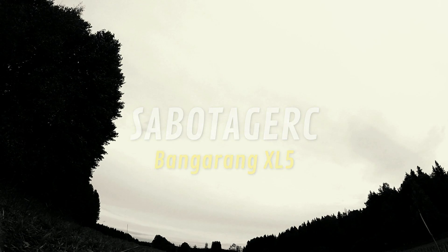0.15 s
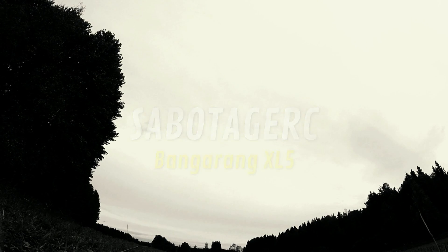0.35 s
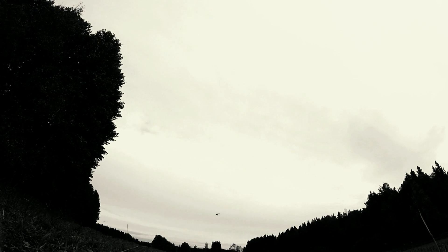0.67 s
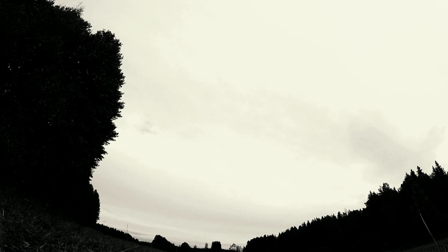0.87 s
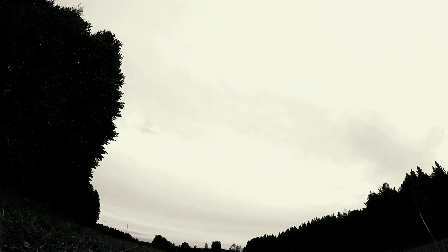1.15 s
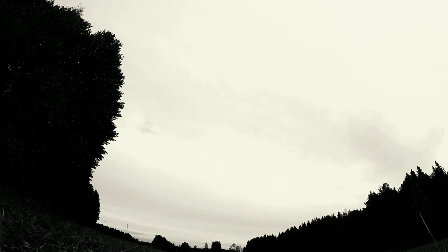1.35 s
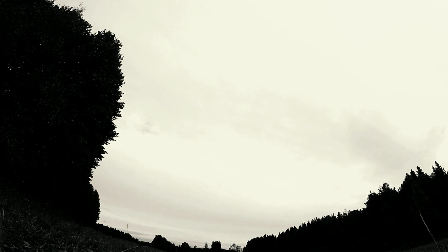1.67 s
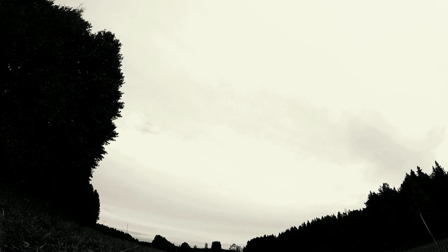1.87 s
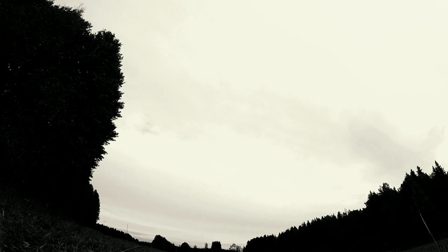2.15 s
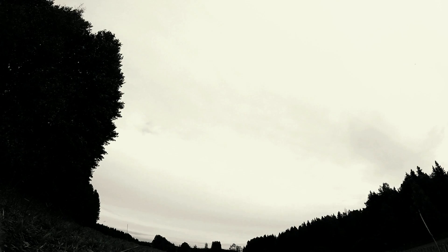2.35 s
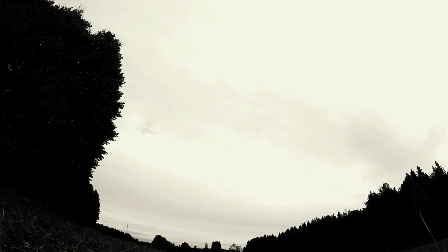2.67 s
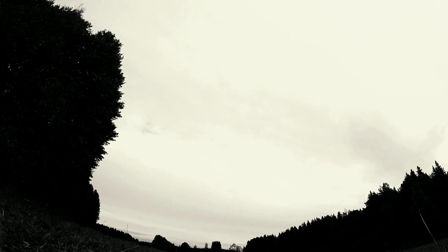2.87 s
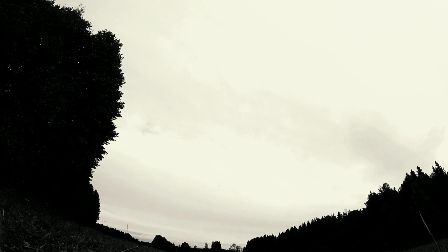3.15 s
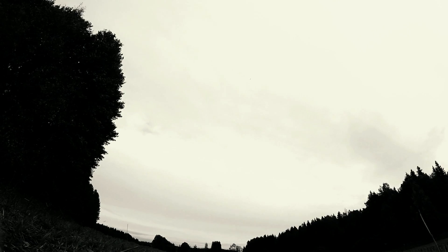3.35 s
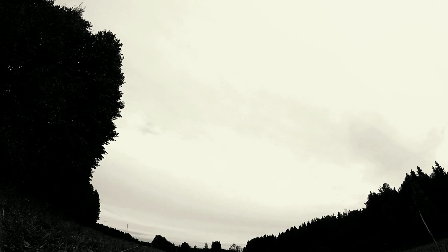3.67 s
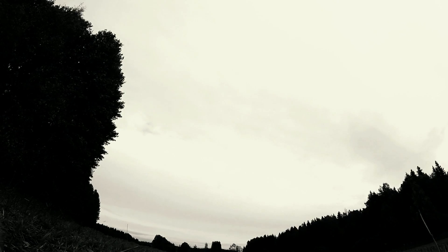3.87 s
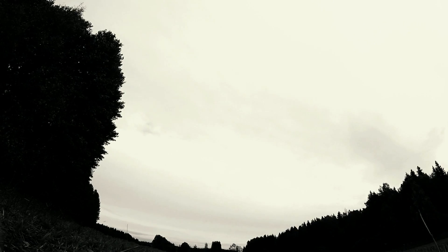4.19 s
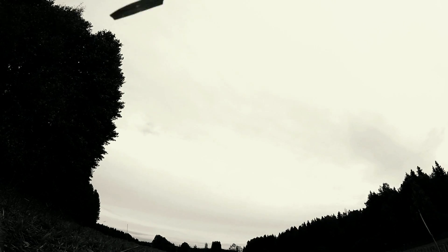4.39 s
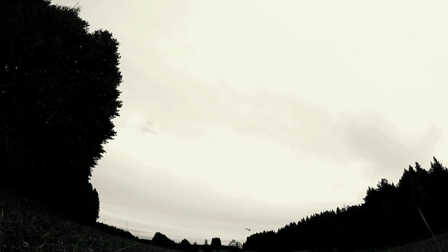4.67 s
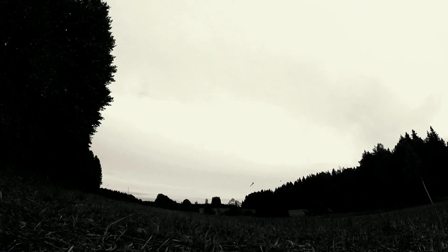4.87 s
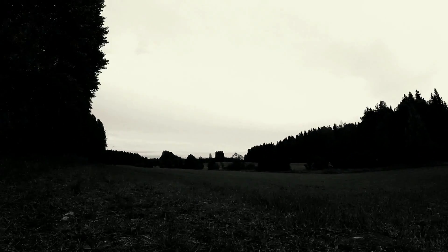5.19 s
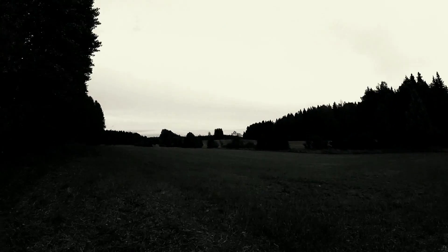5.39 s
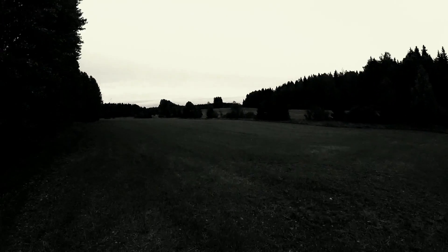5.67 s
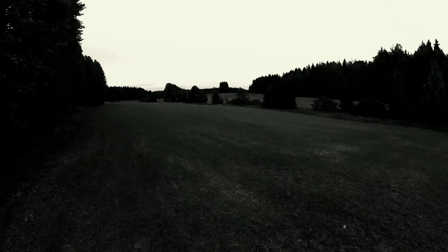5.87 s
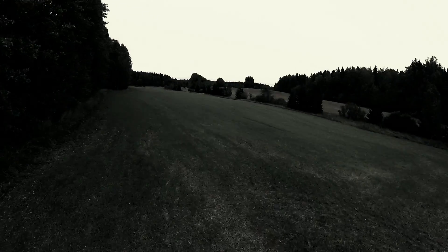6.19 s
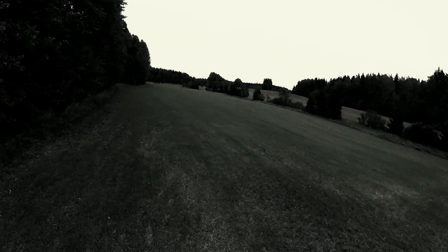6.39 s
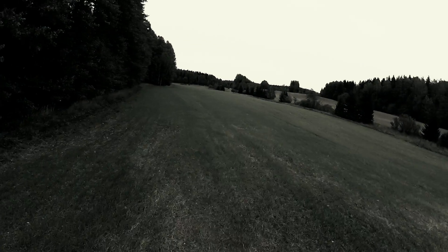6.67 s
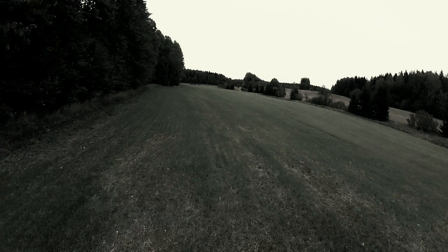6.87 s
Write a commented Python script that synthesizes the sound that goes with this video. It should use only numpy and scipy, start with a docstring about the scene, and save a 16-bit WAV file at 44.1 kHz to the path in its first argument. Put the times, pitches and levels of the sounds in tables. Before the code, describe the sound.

Heard from a microphone on the frame of a small quadcopter in an open field, four slow motors idle with an uneven, beating rattle, thin hiss and small knocks. Wind thumps softly. After about four and a half seconds they surge with a roar of air on grass, climb to a harsh buzzing whine, ease down to a lower drone, then speed up again, still rising at the end.

```python
"""Small quadcopter, idle to take-off

A quadcopter with three-blade propellers on an open field, heard by a microphone on its own frame.
Four motors idle in the grass and shake the frame, then race up at take-off, ease off and speed up again.
Tones follow the turning shafts, unequal speeds make them beat, and filtered noise chopped by the blades
gives wash and hiss. Ringing frame modes give knocks, low noise the breeze and gusts on the microphone."""
import sys
import numpy as np
from scipy import signal
from scipy.fft import rfft, irfft
from scipy.io import wavfile
from scipy.ndimage import uniform_filter1d

SR = 44100
rng = np.random.default_rng(int(sys.argv[2]) if len(sys.argv) > 2 else 0)


def dump(signal):
    """Clip the signal to [-1, 1] and save it as 16-bit WAV at the path in sys.argv[1]."""
    limited = np.clip(np.atleast_2d(signal).T, -1, 1)
    pcm = np.round(limited * 32767).astype(np.int16)
    wavfile.write(sys.argv[1], SR, pcm)


N = 310464
TIME = np.arange(N) / SR
BLADES, MAGNETS = 3, 14   # per propeller, per motor
LIFT_S = 4.71   # lift-off


def from_db(db):
    """Decibels to gain."""
    return 10 ** (np.asarray(db) / 20)


def rms_one(x):
    """Scale to unit power."""
    return x / np.sqrt(np.mean(x ** 2) + 1e-20)


def evened(x, size=4096):
    """Hold the short-term power near one, over a window of size samples."""
    power = np.abs(uniform_filter1d(x ** 2, size=size))
    return x / np.sqrt(power + 1e-3 * np.mean(x ** 2))


def in_time(rows):
    """Each column of a curve at every sample."""
    s, *columns = np.transpose(rows)
    return [np.interp(TIME, s, c) for c in columns]


def ramp(start_s, length_s):
    """Rises evenly from 0 to 1."""
    return np.clip((TIME - start_s) / length_s, 0, 1)


def swells(rows, edge_s):
    """Gain of events that each rise, hold and fall."""
    gain = 0
    for start_s, length_s, db in rows:
        rise = ramp(start_s - edge_s / 2, edge_s)
        fall = ramp(start_s + length_s - edge_s / 2, edge_s)
        gain = gain + from_db(db) * (rise - fall)
    return gain


def noise():
    """White noise."""
    return rng.standard_normal(N)


def drift(rate_hz):
    """Slow chance movement with spread 1, drawn every 40 samples and joined by straight lines."""
    step, settle = 40, 2000
    r = np.exp(-2 * np.pi * rate_hz * step / SR)
    draws = rng.standard_normal(N // step + settle + 2)
    slow = signal.lfilter([1], [1, -2 * r, r * r], draws)[settle:]
    return np.interp(np.arange(N) / step, np.arange(len(slow)), rms_one(slow))


def coloured(x, spectrum):
    """Filter a sound by a curve in dB over log frequency that falls away beyond its ends; rms 1."""
    hz, db = np.transpose(spectrum)
    f = np.maximum(np.arange(N // 2 + 1) * SR / N, 1)
    skirts = np.minimum(f / hz[0], 1) ** 3 * np.minimum(hz[-1] / f, 1) ** 4
    gain = from_db(np.interp(np.log(f), np.log(hz), db)) * skirts
    return rms_one(irfft(rfft(x) * gain, N))


def ring(x, hz, t60):
    """One mode: a unit click sets a sine of height 1 ringing, down 60 dB after t60 seconds."""
    r, w = from_db(-60 / (t60 * SR)), 2 * np.pi * hz / SR
    return signal.lfilter([0, np.sin(w)], [1, -2 * r * np.cos(w), r * r], x + 1e-18)


def tone(cycles):
    """A sine of rms 1."""
    return np.sqrt(2) * np.sin(2 * np.pi * cycles)


def revolving(turns, orders, db, size=2048):
    """A vibration pattern that repeats with each turn of a shaft, made of multiples of its rate."""
    angle = np.arange(size + 1) / size
    phases = rng.random((len(orders), 1))
    pattern = from_db(db) @ np.sin(2 * np.pi * (np.outer(orders, angle) + phases))
    return np.interp(turns % 1, angle, rms_one(pattern))


def chopped(cycles, depth):
    """Turbulence that flares briefly once a cycle."""
    return rms_one(noise() * (1 + depth * np.cos(np.pi * cycles) ** 8))


def idling():
    """Slow motors hunt around their speeds: blade hum, magnet tone and a frame rattling at every turn."""
    # Each row: time in seconds, leading motor in turns per second, frame shaking in relative dB.
    idle = [(0.0, 45.3, -32), (0.4, 46.1, -29.5), (0.6, 45.1, -28.5), (0.87, 45.6, -30),
            (1.25, 45.7, -27.5), (2.15, 46.1, -26.5), (2.45, 45.8, -26.5), (2.7, 46.6, -27),
            (3.05, 45.4, -27), (3.3, 45.6, -27.5), (3.41, 47.3, -30.5), (3.52, 46.1, -30.5),
            (4.07, 46.3, -29.5), (4.17, 46.2, -28.5), (4.45, 45.8, -29.5), (4.68, 45, -28)]
    # The other three motors, in turns per second.
    other_shafts_hz = [46.95, 40.97, 44.78]
    # Blade hum swelling as the rotors fall in step. Each row: start in seconds, length in seconds, level in dB.
    hum_swells = [(0.0, 0.18, -19.5), (0.36, 0.13, -21), (0.59, 0.24, -19.5), (1.07, 0.49, -19.5),
                  (1.62, 0.12, -12.5), (1.78, 0.19, -19.5), (2.33, 0.33, -15.5), (2.72, 0.31, -13.5),
                  (3.15, 0.28, -22), (3.9, 0.46, -18.5)]
    # Clear tones of the leading motor. Each row: multiple of the shaft rate, dB against the shaking.
    idle_tones = [(9, -29), (11, -11.5), (12, -24.5), (24, -17), (31, -28.5), (36, -20), (49, -26)]
    # Spectrum of the rattling frame. Each row: frequency in Hz, relative level in dB per Hz.
    rattle_spectrum = [(100, -29), (165, -7), (200, 4.5), (245, 0.5), (320, -14), (410, -4), (570, -5.5),
                       (810, -4), (970, -15.5), (1130, -11), (1300, -13), (1520, -20.5), (2100, -23.5),
                       (2500, -29.5), (3000, -27.5)]
    # Spectrum of the idle hiss. Each row: frequency in Hz, relative level in dB per Hz.
    idle_hiss = [(1500, -18), (2600, -9.5), (3000, -8.5), (3500, -4.5), (4400, -13.5), (4700, -7),
                 (4920, 1), (5350, -7.5), (5680, -2), (6050, -11), (6550, -3.5), (8000, -18), (9600, -20.5),
                 (12000, -35)]
    hum_db, magnet_db = -24.5, -31   # before swells, shaking and flutter
    lead_wander, wander = 0.003577, 0.006   # speed spread as a share
    loose = 0.57   # noise once a turn, against the repeating rattle

    lead_hz, shake = in_time(idle)
    lead = np.cumsum(lead_hz * (1 + lead_wander * drift(8.6))) / SR
    shafts = [lead]
    for hz in other_shafts_hz:
        shafts.append(np.cumsum(hz * (1 + wander * drift(5.775))) / SR)

    hum = np.hypot(from_db(hum_db), swells(hum_swells, edge_s=0.1)) * from_db(2 * drift(15.7))
    magnet = from_db(magnet_db + shake - np.mean(shake) + 1.7 * drift(9))
    out = hum * tone(BLADES * lead) + magnet * tone(MAGNETS * lead)
    for order, db in idle_tones:
        out += from_db(shake + db) * tone(order * lead + rng.random())
    other_hum = sum(tone(BLADES * turns + rng.random()) for turns in shafts[2:])
    out += from_db(-14) * np.mean(hum) * other_hum
    out += singing(shafts[:2])

    orders, rattle = np.arange(1, 64), 0
    for turns in shafts:
        pattern = revolving(turns, orders, np.zeros(len(orders)))
        rattle = rattle + pattern * from_db(3 * drift(33)) + loose * chopped(turns, depth=3.5)
    out += from_db(shake + 4) * coloured(rattle, rattle_spectrum)

    swell = 0.5 * (shake + np.mean(shake))   # the hiss follows the shaking only by half
    hiss = coloured(chopped(BLADES * lead, depth=0.43), idle_hiss)
    return out + from_db(swell - 14) * hiss


def singing(shafts, order=42, peak_hz=1993):
    """Switching whine of two motors, partly through a narrow resonance and evened, with set pips on its pitch."""
    # A motor dwells on its resonance. Each row: start in seconds, length in seconds, level in dB.
    pips = [(3.34, 0.051, -37.5), (3.43, 0.024, -34), (4.15, 0.07, -32.5), (4.51, .035, -37)]
    whine = sum(tone(order * turns) for turns in shafts)
    resonant = rms_one(ring(whine, peak_hz, t60=0.74))
    steady = evened(resonant + from_db(3) * rms_one(whine), size=1500)
    pip_tone = tone(peak_hz * TIME + 0.062 * drift(25))
    return from_db(-45 + 2 * drift(30)) * steady + swells(pips, edge_s=0.026) * pip_tone


def jolts():
    """The frame rocks on soft ground and rings in its modes; light knocks come at random until lift-off."""
    # Each row: time in seconds, relative peak in dB.
    jolt_rows = [(0.391, -15), (1.483, -15.5), (1.969, -14.5), (2.033, -12.5), (2.072, -9), (3.313, -6.5),
                 (3.333, -13), (3.359, -11.5), (3.534, -13), (3.729, -13), (3.835, -16), (4.492, -20),
                 (4.778, -15.5), (4.867, -11), (5.049, -17)]
    # Modes of the frame. Each row: frequency in Hz, relative level in dB, 60 dB decay time in seconds.
    frame_modes = [(125.4, -2.5, 0.11), (195.5, -1.5, 0.17), (246.5, -1, 0.1), (422, -1.5, 0.062),
                   (824, -4.5, 0.042)]
    knocks_per_s, knock_db, spread_db = 45, -26, 2.5
    at, peak_db = np.transpose(jolt_rows)
    knocks = (rng.random(N) < knocks_per_s / SR) * (TIME < LIFT_S)
    knocks = knocks * from_db(knock_db + spread_db * np.clip(noise(), -2, 2))
    out = np.zeros(N)
    for k, (hz, mode_db, t60) in enumerate(frame_modes):
        clicks = knocks * np.sign(noise())
        clicks[(at * SR).astype(int)] = from_db(peak_db - 3) * (-1) ** k   # modes alternate in sign
        out += from_db(mode_db) * ring(clicks, hz, t60)
    softening = signal.butter(2, 600, fs=SR, output="sos")   # low-pass, Hz
    return signal.sosfilt(softening, out)


def wind():
    """Low noise on the microphone port: a steady breeze with gusts."""
    # Each row: start in seconds, length in seconds, level in dB.
    gusts = [(1.1, 0.57, -38), (1.92, 0.14, -30), (2.47, .12, -30.5), (3.27, 0.14, -23),
             (3.68, 0.21, -23.5), (3.92, 0.32, -31), (4.55, 0.23, -24.5), (4.83, 0.22, -25),
             (5.98, 0.25, -33.5), (6.64, 0.34, -30.5)]
    # Spectrum of air on the port. Each row: frequency in Hz, relative level in dB per Hz.
    gust_spectrum = [(15, -21.5), (28, -1.5), (55, -3.5), (85, -6), (140, -11), (300, -27), (800, -41)]
    breeze_db = -38
    return np.hypot(from_db(breeze_db), swells(gusts, edge_s=0.043)) * coloured(noise(), gust_spectrum)


def hissing(blade_hz, load_db):
    """Gain of the hiss: it grows with blade speed and load, lingers above the grass and flares at set times."""
    # Flares of the hiss. Each row: start in seconds, length in seconds, relative level in dB.
    flares = [(0.385, 0.013, -40), (4.755, 0.042, -33), (5.075, 0.085, -28), (5.185, 0.025, -44),
              (5.235, 0.014, -37), (5.256, 0.024, -28)]
    grass_db, grass_leave_s, grass_fall_db_per_s = -31, 5.16, 34.5   # hiss close above the grass
    reference_hz, db_per_octave, load_share = 660, 3.5, 0.94
    blades = from_db(-45.5 + db_per_octave * np.log2(blade_hz / reference_hz) + load_share * load_db)
    grass = from_db(grass_db - grass_fall_db_per_s * np.maximum(TIME - grass_leave_s, 0))
    onset = ramp(start_s=4.53, length_s=0.19)
    return np.hypot(onset * np.hypot(blades, grass), swells(flares, edge_s=0.0084))


def unbalance(shaft_hz):
    """Gain of a shaft's tone: it peaks on the frame's resonance and settles after lift-off."""
    resonance_hz, width_hz = 193.7, 29.7
    shudder_db, settle_s = 11, 1   # extra level up to lift-off, and its settling time
    detuning = (shaft_hz - resonance_hz) / (width_hz / 2)
    shudder = shudder_db * np.exp(-np.maximum(TIME - LIFT_S, 0) / settle_s)
    return from_db(-21 + shudder) * (shaft_hz / resonance_hz) ** 2 / np.hypot(1, detuning)


def blade_overtones(turns):
    """Each passing blade gives a pressure pulse, heard as fluttering overtones of the blade rate."""
    # Each row: multiple of the shaft rate, relative level in dB.
    overtones = [(6, -12.5), (9, -20.5), (12, -27.5), (15, -29)]
    return sum(from_db(db + 2 * drift(28)) * tone(order * turns + rng.random()) for order, db in overtones)


def magnet_gain(blade_hz, near_ground):
    """Magnets sing with the torque, strongest in hard speeding up or braking, and through the arms' resonance."""
    # Response of the arms. Each row: frequency in Hz, relative level in dB.
    arms = [(1400, -1), (1700, -3), (2100, 1), (2700, 4), (3000, -1), (3400, -9), (4000, -12)]
    full_slope, braking = 1100, 0.75   # blade-rate change for full torque in Hz per second; share when braking
    slope = uniform_filter1d(np.gradient(blade_hz) * SR, size=2048) / full_slope
    torque = np.clip(np.maximum(slope, -braking * slope), 0.7, 1) ** 2 * (1 - near_ground) ** 2
    arm_db = np.interp(blade_hz * MAGNETS / BLADES, *np.transpose(arms))
    return torque * from_db(arm_db + 1.7 * drift(60))


def switching_whine(turns, blade_hz):
    """High tones locked to the shaft that fade as they climb out of the frame's range."""
    # Each row: multiple of the shaft rate, relative level in dB.
    whines = [(36, 3.5), (42, 1.5), (50, -5)]
    whine = sum(from_db(db + 4 * drift(25)) * tone(order * turns) for order, db in whines)
    fade_db = blade_hz / 28 + np.maximum(blade_hz - 380, 0) / 9   # steeper above a blade rate of 380 Hz
    return from_db(-47.5 - fade_db) * whine


def slapping(turns):
    """A pulse from every blade, slightly uneven in time and strength: a wavering ladder of overtones."""
    orders = BLADES * np.arange(3, 14)
    pulses = revolving(turns + 0.0038 * drift(120), orders, np.zeros(len(orders)))
    return pulses * from_db(4 * drift(45))


def slap_gain():
    """The slap builds in the climb, weakens with time and ends as the craft moves off."""
    start_s, length_s, fall_db_per_s = 4.96, 0.47, 14
    fall = from_db(-30.5 - fall_db_per_s * np.maximum(TIME - start_s, 0))
    return fall * ramp(start_s, 0.12) * (1 - ramp(start_s + length_s, 0.21))


def flying():
    """Each rotor gives an unbalance tone, blade tones, motor buzz and chopped air; returns tones and hiss."""
    # Throttle. Each row: time in seconds, blade-pass rate in Hz.
    throttle_rows = [(4.66, 229.4), (4.72, 348.2), (4.775, 485), (4.84, 449.7), (5.0, 523.5), (5.13, 668.3),
                     (5.39, 711.3), (5.52, 663.5), (5.7, 542.3), (5.9, 366.3), (6.02, 329.6), (6.2, 319.1),
                     (6.34, 337.3), (6.52, 466.7), (6.71, 608), (6.85, 660), (7.04, 691)]
    # Steering. Each row: time in seconds, then the speed of each of the four rotors as a ratio to the throttle.
    steering = [(4.72, 0.48, 0.55, 1.02, 0.45), (4.78, 0.67, 1.01, 1.04, 0.6), (4.83, 0.89, 1.05, 1.0, 0.8),
                (4.91, 0.97, 1.1, 1.0, 0.84), (4.97, 1, 1.05, 0.99, 0.88), (5.06, 0.99, 1.04, 1.06, 0.98),
                (5.13, 0.97, 1.07, 0.98, 1.03), (5.21, 1.007, 1.02, 0.96, 0.96),
                (5.29, 1.027, 0.99, 0.94, 0.98), (5.46, 1.012, 1.02, 0.95, 1.03),
                (5.6, 1.025, 1.0, 0.96, 1.03), (5.8, 1.0, 0.96, 0.95, 1.02), (5.9, 1.0, 1.02, 0.96, 1.03),
                (6.02, 1.0, 1, 0.97, 1.04), (6.12, 1.01, 1.02, 0.93, 1.05), (6.22, 1, 1.04, 0.96, 1.03),
                (6.29, 0.98, 1.02, 0.915, 1.0), (6.37, 1.005, 1.07, 0.955, 1.03),
                (6.425, 1.006, 1.18, 1.0, 1.055), (6.5, 1.026, 1.17, 1.03, 1.065),
                (6.58, 1, 1.134, 0.99, 1.06), (6.67, 1.005, 1.11, 0.97, 1.06),
                (6.8, 1.012, 1.12, 0.95, 1.06), (7.04, 0.998, 1.08, 0.95, 1.04)]
    # Load on the blades. Each row: time in seconds, level of the blade tone in dB before share and flutter.
    load_rows = [(4.69, -23), (4.745, -14.5), (4.815, -25), (4.865, -19), (4.915, -19), (4.96, -23.5),
                 (5.25, -24.5), (5.52, -21.5), (5.75, -22.5), (5.87, -26), (6.2, -23.5), (6.36, -20),
                 (6.56, -14), (7.04, -14)]
    # Each row, one rotor: relative dB in the climb, in forward flight, of its unbalance, of its magnets.
    rotors = [(-2, -1, -5.5, -8), (-13, -8, -18.5, 0.5), (0.5, -14, -6, -0.5), (-15, -19, -22, -4)]
    # Motor buzz. Each row: multiple of the shaft rate, relative level in dB.
    buzz_pattern = [(4, -4.5), (8, -13.5), (11, -5.5), (14, -1), (18, -4), (22, -5), (27, -2.5), (33, 1),
                    (48, -5)]
    # How the frame passes the buzz on. Each row: frequency in Hz, relative level in dB.
    body = [(300, -3), (1000, 0), (1600, 3.5), (2200, -2.5), (2800, 2.5), (3400, -0.5), (3900, -12),
            (5000, -24), (6500, -17), (8000, -26), (11000, -42)]
    # Spectrum of the rotor wash. Each row: frequency in Hz, relative level in dB per Hz.
    wash = [(120, -34), (200, -1), (348, 0), (483, 4), (633, -10), (900, -12.5), (1500, -13), (2180, -5.5),
            (3030, -3), (3600, -13), (4200, -31), (5590, -45), (6000, -54), (7800, -21), (13200, -120)]
    # Spectrum of the flight hiss. Each row: frequency in Hz, relative level in dB per Hz.
    flight_hiss = [(1760, -45), (3000, -67), (3330, 0), (3640, -5.5), (4310, -3), (4530, -1), (5140, 6.5),
                   (6020, 1), (6630, 5), (7620, -7), (9480, -8.5), (10600, -28.5), (12800, -4),
                   (16600, -79), (22000, -120)]
    # Blades slapping in their own wash. Each row: frequency in Hz, relative level in dB per Hz.
    slap_spectrum = [(1900, -1.5), (2700, -3), (3400, -17), (4100, -5.5), (5200, -2.5), (6600, 2.5),
                     (7500, -7.5), (9000, -10)]
    tilt_s, tilt_takes_s = 5.613, 0.4   # the craft tips into forward flight
    wobble_hz, wobble_share, wobble_at_s, wobble_spread_s = 7.2, 0.0096, 6.16, 0.53
    wander, ground_wander, hunting = 0.0032, 0.016, 0.000987   # speed spread as a share
    fray, climb_fray, ground_fray = 0.0035, 0.005, 0.03   # timing spread in turns
    in_step_s, climb_s = 5.04, 0.301   # shafts in phase; time for the ground's effect to decay

    throttle = in_time(throttle_rows)[0]
    blade_db = in_time(load_rows)[0]
    load_db = blade_db - np.mean(blade_db)
    # the speed control overshoots as the craft levels out
    since = TIME - wobble_at_s
    wobble = wobble_share * np.exp(-0.5 * (since / wobble_spread_s) ** 2) * np.cos(2 * np.pi * wobble_hz * since)
    speeds = [throttle * (ratio + wobble) for ratio in in_time(steering)]
    tilt = ramp(tilt_s - tilt_takes_s / 2, tilt_takes_s)
    shares = [from_db(climb + tilt * (forward - climb)) for climb, forward, _, _ in rotors]
    shares = shares / np.sqrt(np.sum(np.square(shares), axis=0))   # total power stays at one

    # close to the ground the rotors stumble in their own wash and the blades bite less
    near_ground = np.exp(-np.maximum(TIME - LIFT_S, 0) / climb_s)
    unsteady = wander + ground_wander * near_ground
    bite = from_db(-3 * (0.5 - tilt) - 5 * near_ground)
    buzz_db = -34.5 + 0.78 * load_db - 4 * near_ground   # follows part of the load's swing

    orders = np.arange(4, 49)
    on_blade = orders % BLADES == 0
    buzz_orders_db = np.interp(orders, *np.transpose(buzz_pattern)) + 6 * on_blade
    out, motors, rasp, air, slap = 0, 0, 0, 0, 0
    for blade_hz, share, (_, _, unbalance_db, pull_db) in zip(speeds, shares, rotors):
        shaft_hz = blade_hz / BLADES
        turns = np.cumsum(shaft_hz * (1 + unsteady * drift(40.4) + hunting * drift(7.2))) / SR
        turns = turns - np.interp(in_step_s, TIME, turns)
        # eddies make each blade early or late, which frays the high overtones most
        frayed = turns + (fray + climb_fray * (1 - tilt) + ground_fray * near_ground) * drift(40)

        out = out + from_db(unbalance_db) * unbalance(shaft_hz) * tone(turns)
        out = out + share * from_db(-44) * tone(2 * turns + rng.random())
        blade_gain = from_db(blade_db + (1 + 3 * near_ground) * drift(35))
        overtones = share ** 0.98 * bite * blade_overtones(frayed)
        out = out + blade_gain * (share * tone(BLADES * turns) + overtones)
        # uneven pull roughens the magnet tone
        magnets = tone(MAGNETS * frayed + 0.03 * unsteady / wander * drift(92))
        out = out + from_db(buzz_db - 4 + pull_db) * magnet_gain(blade_hz, near_ground) * magnets
        out = out + np.sqrt(share) * switching_whine(frayed, blade_hz)

        motors = motors + share ** 0.59 * revolving(frayed, orders, buzz_orders_db) * from_db(2.5 * drift(41))
        rasp = rasp + share * revolving(frayed, orders, 12 * on_blade)
        air = air + share * chopped(turns, depth=0.51)
        slap = slap + share * slapping(frayed)

    out += slap_gain() * coloured(slap, slap_spectrum)
    out += from_db(buzz_db - 2) * evened(coloured(motors, body))
    out += from_db(buzz_db - 4.5 - 5 * (1 - tilt)) * coloured(air, wash)
    # the treble is chopped air over a ladder of blade overtones
    treble = from_db(-2.5) * coloured(air, flight_hiss) + from_db(-20.5) * coloured(rasp, flight_hiss)
    return out, hissing(throttle, load_db) * from_db(1.8 * drift(28)) * treble


def ground_wash():
    """Air thrown against the grass roars in lumps as the craft leaves the ground."""
    # Bursts at lift-off. Each row: start in seconds, length in seconds, level in dB before the lumps.
    roars = [(4.66, 0.078, -32), (4.74, 0.065, -27.5), (4.805, 0.2, -34)]
    # Air against the grass. Each row: frequency in Hz, relative level in dB per Hz.
    roar_spectrum = [(150, -3), (500, -2), (1000, 5), (1700, 1.5), (2600, -7), (4000, -27)]
    return swells(roars, edge_s=0.03) * from_db(2.5 * drift(45)) * coloured(noise(), roar_spectrum)


def scene():
    """Idle gives way to flight in a short crossfade at lift-off; the hiss swells first."""
    fade_s = 0.079
    lift = np.pi / 2 * ramp(LIFT_S - fade_s / 2, fade_s)
    tones, hiss = flying()
    craft = np.cos(lift) * idling() + np.sin(lift) * tones + hiss
    return (craft + ground_wash() + jolts() + wind())[None]


def record(dry):
    """The microphone rounds the peaks and cuts the top, 70 dB down from 12900 Hz upward."""
    top = 0.89
    low_pass = signal.cheby2(12, 70, 12900, fs=SR, output="sos")
    return signal.sosfilt(low_pass, top * np.tanh(dry / top))


dry = scene()
out = record(dry)
dump(out)
```